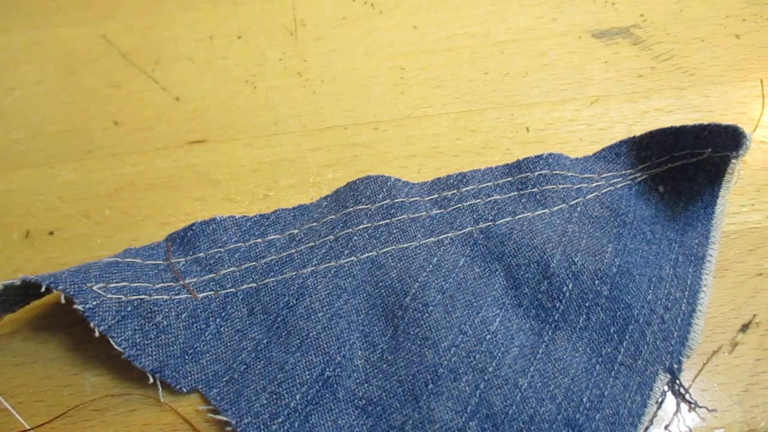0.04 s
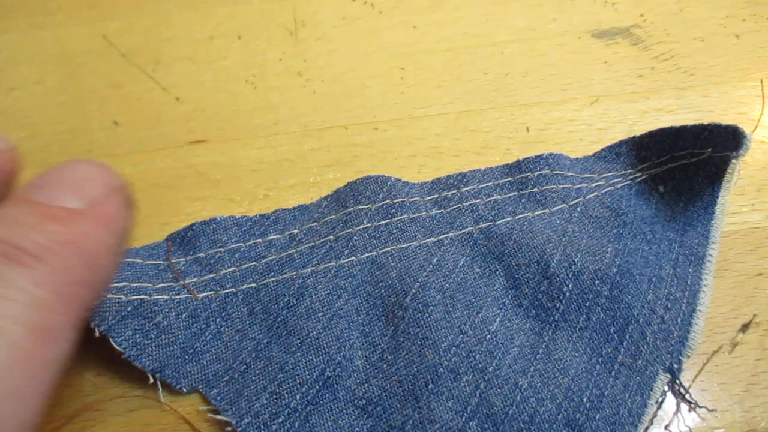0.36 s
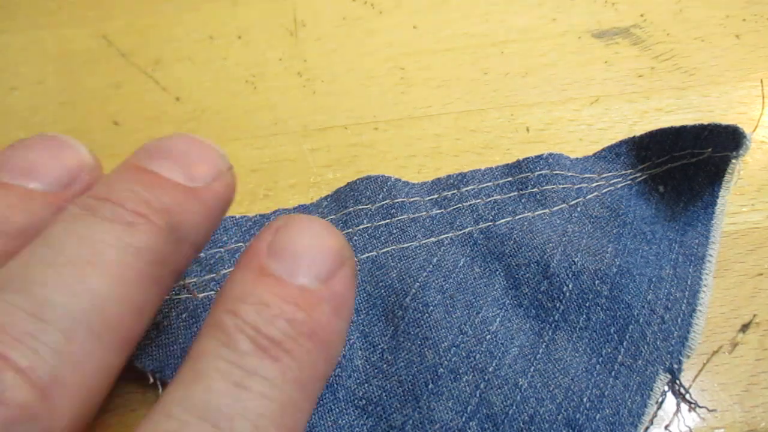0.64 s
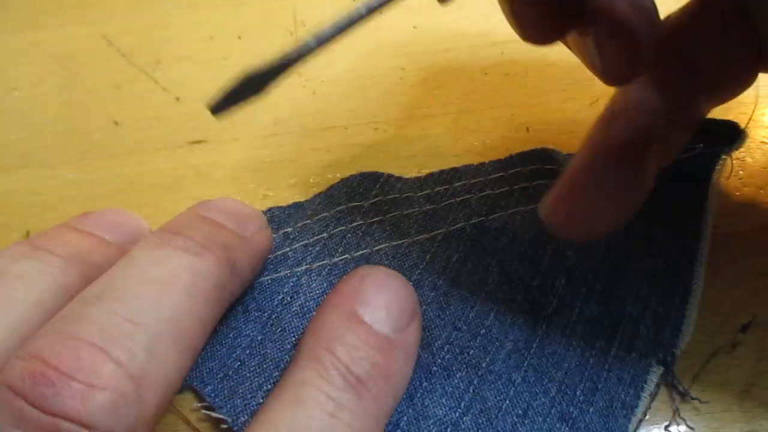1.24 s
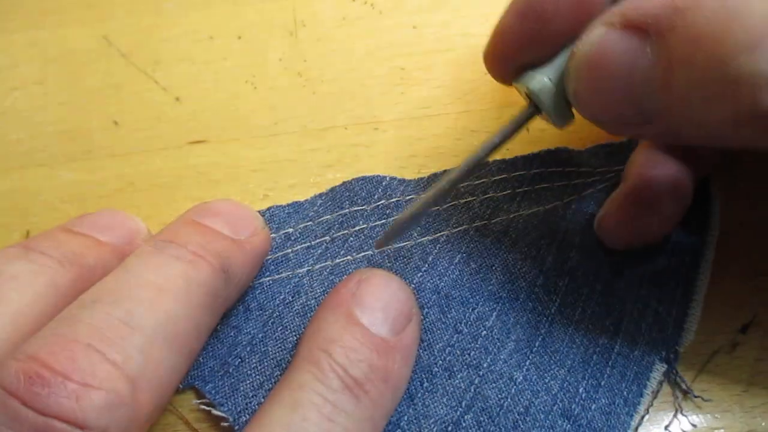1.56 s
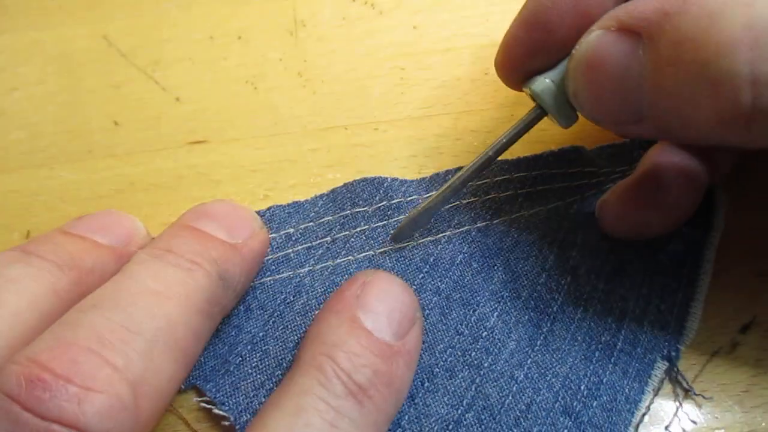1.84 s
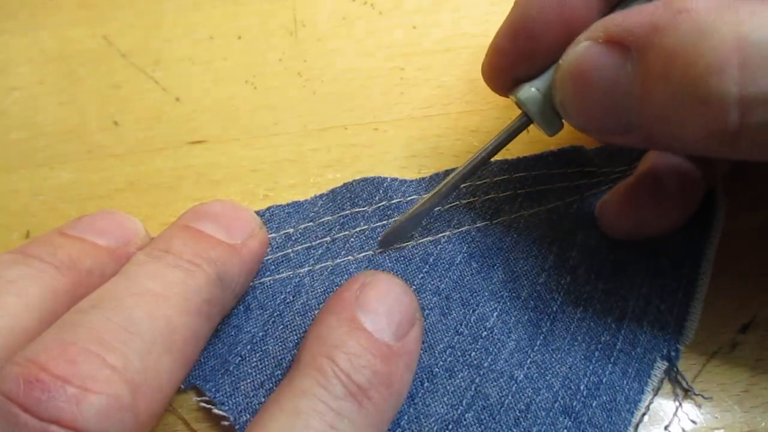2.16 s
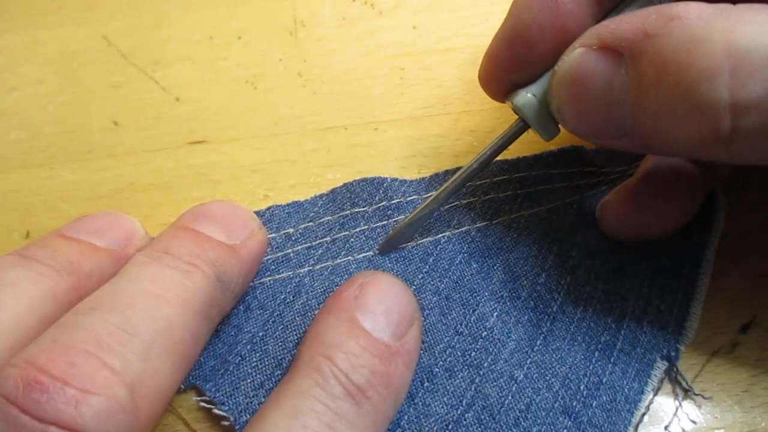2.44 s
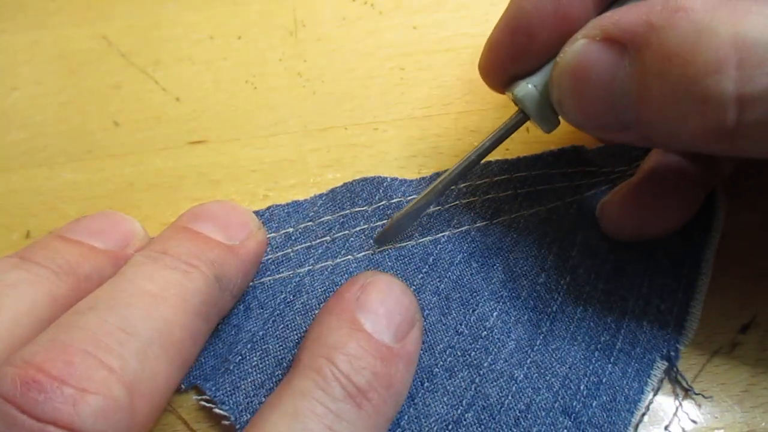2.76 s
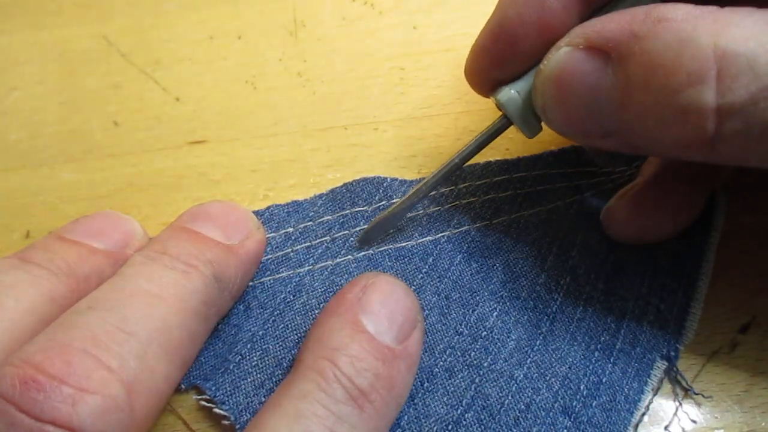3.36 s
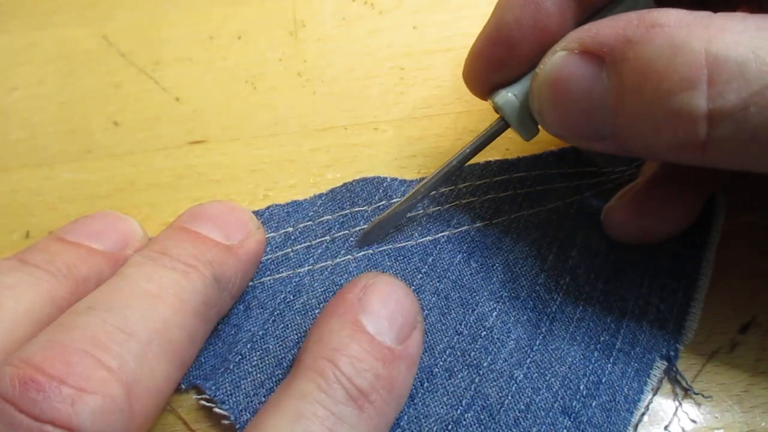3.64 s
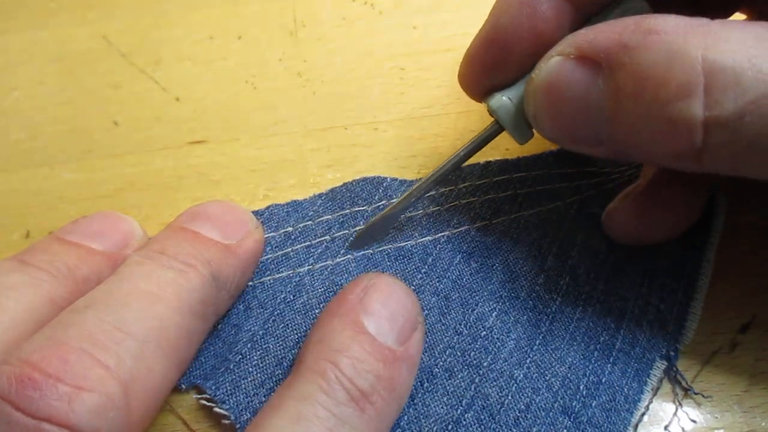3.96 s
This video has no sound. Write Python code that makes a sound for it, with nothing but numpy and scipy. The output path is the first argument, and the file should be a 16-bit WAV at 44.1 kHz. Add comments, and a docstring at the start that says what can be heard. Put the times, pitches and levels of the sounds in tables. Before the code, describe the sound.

One light metal clink of a screwdriver, then a dull knock and tiny taps.

```python
"""A quiet room opens up: mains hum, hiss and, once a second, the faint beat of a clock.
Cloth slides, and a small screwdriver is lifted off a wooden table with one bright clink, its steel
ringing from a quick rattle of contacts. A hand bumps the wood with a dull knock. Then the tool,
damped by the fingers, ticks lightly as its tip is set on a scrap of denim."""
import sys
import numpy as np
from scipy import signal
from scipy.fft import rfft, irfft
from scipy.io import wavfile

SR = 44100
rng = np.random.default_rng(int(sys.argv[2]) if len(sys.argv) > 2 else 0)


def waveform_to_disk(signal):
    """Save audio, clipped to [-1, 1], as 16-bit WAV at the path in sys.argv[1]."""
    frames = np.transpose(np.atleast_2d(signal))
    scaled = np.clip(frames, -1, 1) * 32767
    samples = np.round(scaled).astype(np.int16)
    wavfile.write(sys.argv[1], SR, samples)


N = 176400


def amp(db):
    """Decibels to gain."""
    return 10 ** (np.asarray(db) / 20)


def unit_rms(x):
    """Scales to rms 1."""
    return x / np.sqrt(np.mean(x ** 2) + 1e-20)


def add(mix, s, sound):
    """Mixes a sound in at s seconds."""
    part = mix[round(s * SR):][:len(sound)]
    part += sound[:len(part)]


def colour(x, eq):
    """Shapes x with an EQ curve of (f/Hz, level/dB) points; rms 1."""
    hz, db = np.transpose(eq)
    f = np.fft.rfftfreq(len(x), 1 / SR)
    gain = amp(np.interp(np.log(f + 1), np.log(hz), db))
    return unit_rms(irfft(rfft(x) * gain, len(x)))


def noise(eq, size=N):
    """Steady noise in the colour of an EQ curve; rms 1."""
    return colour(rng.standard_normal(size), eq)


def burst(eq, t60, tail_db, tail_t60):
    """A contact: dense resonances that die quickly, then a weak room tail."""
    t = np.arange(SR // 2) / SR
    return noise(eq, size=len(t)) * np.hypot(amp(-60 * t / t60), amp(tail_db - 60 * t / tail_t60))


def ring(modes):
    """Struck modes, each dying at its own rate."""
    t = np.arange(SR // 2) / SR
    return sum(amp(db - 60 * t / t60) * np.sin(2 * np.pi * (hz * t + rng.random()))
               for hz, db, t60 in modes)


def swells(moves):
    """A smooth rise and fall for each movement of the hand."""
    t = np.arange(N) / SR
    return sum(amp(db) * np.exp(-((t - s) / half) ** 2) for s, half, db in moves)


def room_tone(crossover_hz=2190):
    """The bed: low room noise, even hiss above it and a wavering hum."""
    # colour of the room noise: f/Hz, level/dB
    room_eq = [(12, -35), (27, -19), (40, -9), (56, -0.5), (78, -14), (98, -5), (118, -1), (142, -11),
               (172, -8), (202, -7), (228, -13), (262, -6), (281, -13.5), (301, -7), (321, -16.5),
               (342, -11.5), (362, -15.5), (388, -13), (422, -19.5), (452, -14.5), (660, -23.5), (860, -25),
               (1200, -27.5), (2200, -33)]
    # colour of the microphone hiss: f/Hz, level/dB
    hiss_eq = [(1180, 6), (2000, 1), (2500, -1.5), (2730, -1), (2950, -1), (3190, -3), (8480, -7),
               (12100, -11.5), (15800, -19.5)]
    # tones of mains and appliances: f/Hz, level/dB, width/Hz
    hum_tones = [(58.13, -55, 2.4), (118.6, -58.5, 6.6), (134.6, -61.5, 1.3), (263.6, -56.5, 8.4),
                 (470, -68.5, 4.6), (598, -73.5, 1.8), (11840, -84.5, 10)]
    f = np.fft.rfftfreq(N, 1 / SR)
    low_share = 1 / (1 + (f / crossover_hz) ** 8)
    lows = irfft(rfft(noise(room_eq)) * np.sqrt(low_share), N)
    hiss = irfft(rfft(noise(hiss_eq)) * np.sqrt(1 - low_share), N)
    out = amp(-45.5) * lows + amp(-62) * unit_rms(hiss)
    for hz, db, width_hz in hum_tones:
        # random phases in a narrow band make the tone waver
        band = np.exp(2j * np.pi * rng.random(len(f))) / (1 + (2 * (f - hz) / width_hz) ** 2)
        out += amp(db) * unit_rms(irfft(band, N))
    return out


def clock(attack_s=0.01, t60=0.31):
    """Two soft strokes a beat, blurred by the room; the first one rings the case."""
    # beats: t/s, level/dB, gap to second stroke/s, its level against the first/dB
    beats = [(.508, 1.5, .033, 3.5), (1.508, -0.5, 0.046, -5), (2.53, 0, .018, 3), (3.522, 1, 0.021, -1.5)]
    # colour of a stroke: f/Hz, level/dB
    stroke_eq = [(300, 3), (700, 1), (1050, 1.5), (1450, -5.5), (1850, -3), (2130, -1), (2400, 0.5),
                 (2750, -13), (3150, -2.5), (3700, -18), (6000, -17), (12000, -30)]
    # ring of the case: f/Hz, level/dB, t60/s
    case_modes = [(2090, -57, 0.25)]
    out, t = np.zeros(N), np.arange(SR // 2) / SR
    attack = np.minimum(t / attack_s, 1)
    envelope = attack * amp(-55 - 60 * t / t60)
    for s, db, gap, second_db in beats:
        add(out, s, amp(db) * (envelope * noise(stroke_eq, size=len(t)) + attack * ring(case_modes)))
        add(out, s + gap, amp(db + second_db) * envelope * noise(stroke_eq, size=len(t)))
    return out


def cloth_slides(fibres_per_s=6000, spread_db=2.5):
    """Fibres catch and slip under each slide, blending into a soft rustle."""
    # slides of hand and cloth: centre t/s, half length/s, level/dB
    slides = [(0.387, 0.12, -1), (0.75, 0.036, -4), (0.96, 0.11, 0.5), (1.22, 0.19, 1), (1.56, 0.025, -1),
              (2.957, 0.036, -6.5), (3.57, 0.057, 1)]
    # colour of the rustle: f/Hz, level/dB
    cloth_eq = [(150, 3), (300, 9), (550, 0), (1000, 0.5), (2000, -5), (3600, -13.5), (5200, -12),
                (8000, -21), (16000, -26)]
    sizes = amp(spread_db * np.minimum(rng.exponential(1, N), 4)) * rng.standard_normal(N)
    slips = sizes * (rng.random(N) < fibres_per_s / SR)
    return amp(-56.5) * swells(slides) * colour(slips, cloth_eq)


def hand_presses():
    """The table rumbles as the hand settles and presses on it."""
    # presses: centre t/s, half length/s, level/dB
    presses = [(.69, 0.085, -50.5), (1.0, 0.074, -50.5), (1.38, 0.055, -48)]
    # colour of the pressed wood: f/Hz, level/dB
    rumble_eq = [(40, -8), (110, -6), (180, -2), (280, 1), (380, -10.5), (600, -21), (2000, -41)]
    return swells(presses) * noise(rumble_eq)


def hand_bump(attack_s=0.00048):
    """A dull, stumbling knock on the wood; the soft hand rounds each attack."""
    # hits of the hand: t/s, level/dB
    bumps = [(1.1893, 0), (1.1935, 0), (1.2, 0), (1.2075, -0.5), (1.2225, -2.5)]
    # colour of the thud: f/Hz, level/dB
    thud_eq = [(60, -10), (160, 3), (330, 11), (520, -8), (800, 6), (1050, -8), (1280, -6), (1550, -3),
               (1850, -9), (2700, -16), (4500, -32), (10000, -55)]
    # modes of the table top: f/Hz, level/dB, t60/s
    board_modes = [(152, 3.5, 0.092), (310, -7, .05), (452, -7, 0.073), (753, -2, 0.039), (845, 0.5, 0.052),
                   (1180, -6, 0.042), (1494, -1.5, 0.038), (1670, -8, 0.044)]
    out, t = np.zeros(N), np.arange(SR // 2) / SR
    attack = 1 - np.exp(-(t / attack_s) ** 2)
    for s, db in bumps:
        thud = amp(-42) * burst(thud_eq, t60=0.04, tail_db=-10.5, tail_t60=0.23)
        body = amp(-45.5) * ring(board_modes)
        add(out, s, amp(db) * attack * (thud + body))
    return out


def screwdriver_ticks(push_t60=0.016):
    """Tiny dry clicks, damped by the fingers, each with a low push through the cloth into the table."""
    # ticks: t/s, click level/dB, push level/dB, push f/Hz
    ticks = [(2.5668, -14.5, -67, 700), (2.648, -1, -42, 730), (2.9485, -14, -43, 800),
             (3.3622, -11, -48, 900), (3.9525, -10.5, -34, 372)]
    # colour of the contact's snap: f/Hz, level/dB
    snap_eq = [(300, 0), (1200, 9), (2000, -12), (3300, 2), (5300, -7), (9000, -6), (16000, -16)]
    # modes of the gripped tool: f/Hz, level/dB, t60/s
    gripped_modes = [(2720, 2.5, 0.0097), (3000, -4.5, 0.0083), (4000, -9, .004), (6570, -5, 0.0055),
                     (8170, -1, 0.011), (9060, -1, 0.0043), (11800, -10, .004), (13100, -13, .008),
                     (14400, -13, .004)]
    out, t = np.zeros(N), np.arange(SR // 2) / SR
    for s, db, push_db, push_hz in ticks:
        snap = amp(-37) * burst(snap_eq, t60=0.003, tail_db=-16, tail_t60=0.089)
        choked_ring = amp(-40) * ring(gripped_modes)
        push = amp(push_db - 60 * t / push_t60) * np.sin(2 * np.pi * push_hz * t)
        add(out, s, amp(db) * (snap + choked_ring) + push)
    return out


def screwdriver_clink():
    """The tool rattles as it is lifted; every contact scrapes brightly and rings the same modes."""
    # contacts: t/s, level/dB
    contacts = [(.5596, 0.5), (.5655, -6), (.5695, -8), (.586, -23), (.592, -10.5)]
    # colour of the scrape: f/Hz, level/dB
    scrape_eq = [(1000, -35), (3000, -18), (3700, -2.5), (6100, -4), (6600, -10), (7800, -13), (8700, 0),
                 (11000, -5), (12800, -6), (14000, -3), (15200, -9), (16000, -16)]
    # modes of the freely ringing steel: f/Hz, level/dB, t60/s
    steel_modes = [(3400, -11.5, 0.19), (3750, -8, 0.082), (4102, -6, 0.17), (4600, -11, .13),
                   (4936, -3, .08), (5210, -7, .06), (5417, 1.5, 0.083), (5830, -6.5, 0.085),
                   (6058, -6, 0.12), (6230, -8, 0.043), (7250, -2, .045), (8300, -6, 0.086),
                   (8380, -6, .08), (8930, -7, 0.12), (8910, -5, .1), (9308, -7, 0.15), (10420, -5, .085),
                   (13400, -9, .05)]
    out = np.zeros(N)
    for s, db in contacts:
        scrape = amp(-38.5) * burst(scrape_eq, t60=0.022, tail_db=-11, tail_t60=0.16)
        steel = amp(-44.5) * ring(steel_modes)
        add(out, s, amp(db) * (scrape + steel))
    return out


def scene():
    """Background, hand and tool at one close microphone."""
    background = room_tone() + clock()
    hand = cloth_slides() + hand_presses() + hand_bump()
    tool = screwdriver_ticks() + screwdriver_clink()
    return (background + hand + tool)[None]


def record(dry, start_s=0.204, cutoff_hz=15900):
    """The sound cuts in after a short silence; a steep low-pass trims the top."""
    gated = dry * (np.arange(N) / SR > start_s)
    low_pass = signal.firwin(511, cutoff_hz, window=("kaiser", 9), fs=SR)
    return signal.oaconvolve(gated, low_pass[None], "same")


dry = scene()
out = record(dry)
waveform_to_disk(out)
```